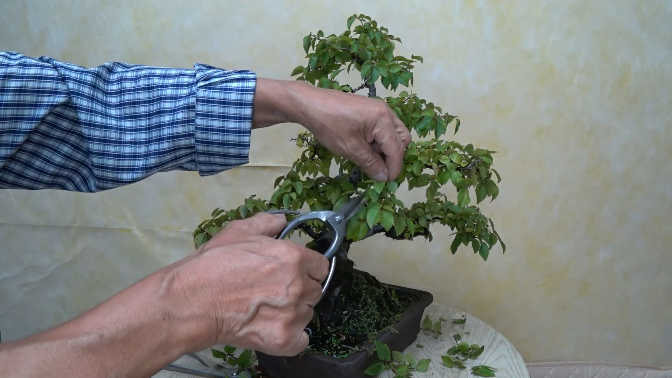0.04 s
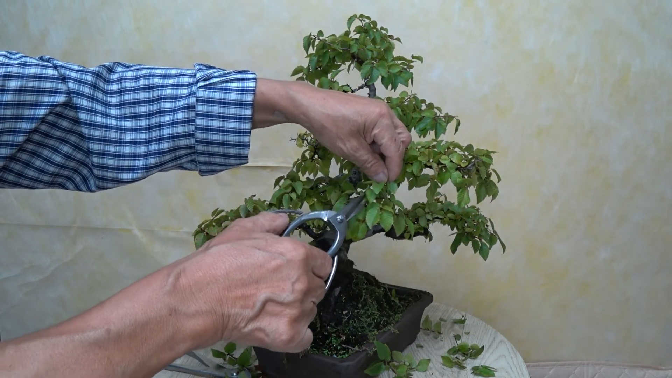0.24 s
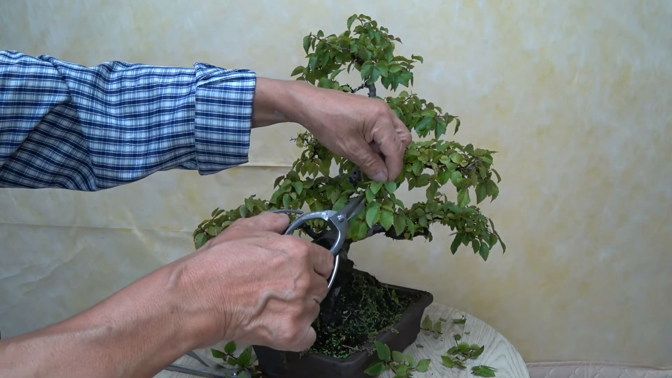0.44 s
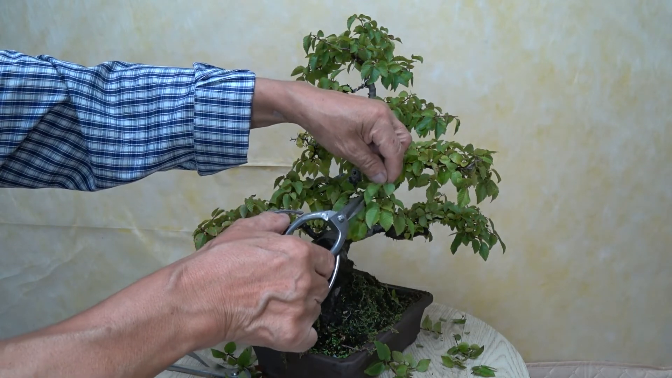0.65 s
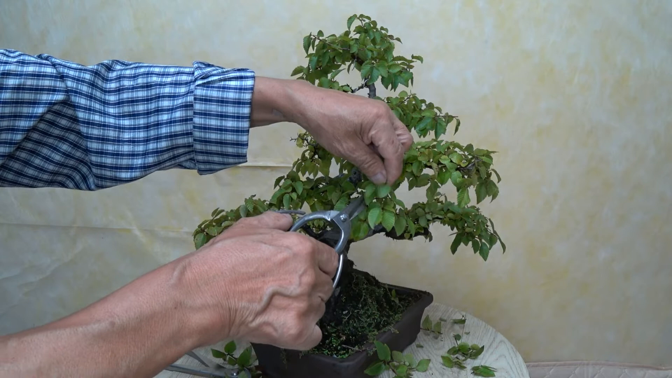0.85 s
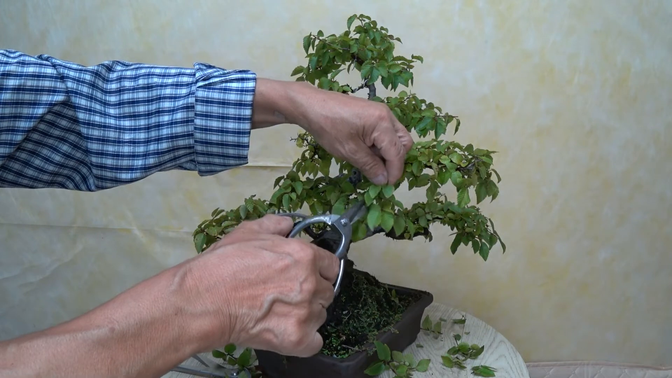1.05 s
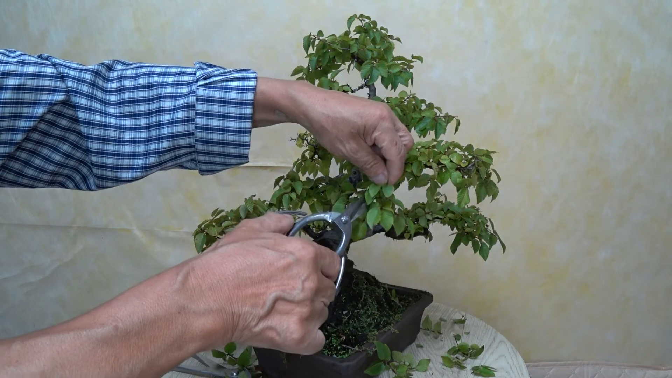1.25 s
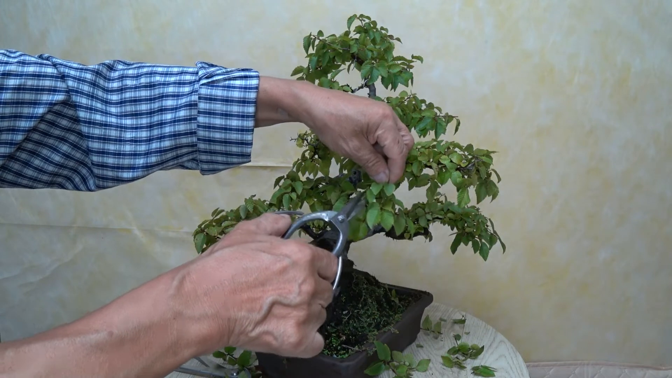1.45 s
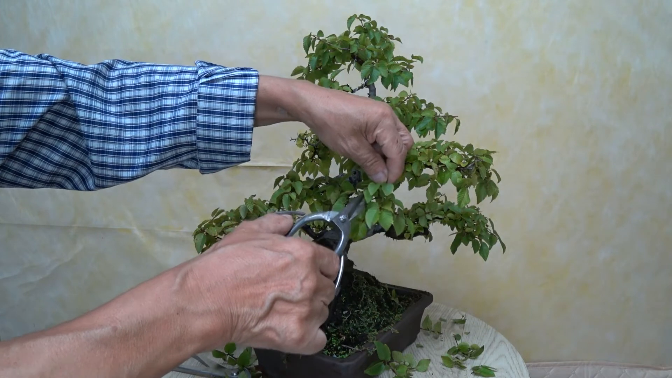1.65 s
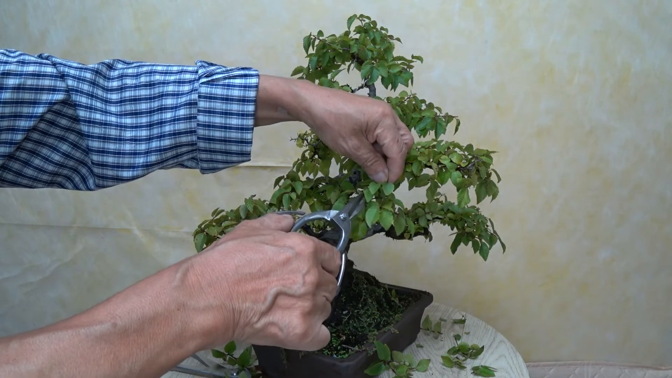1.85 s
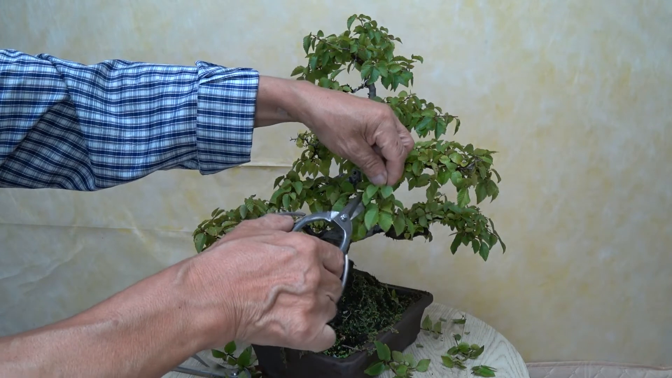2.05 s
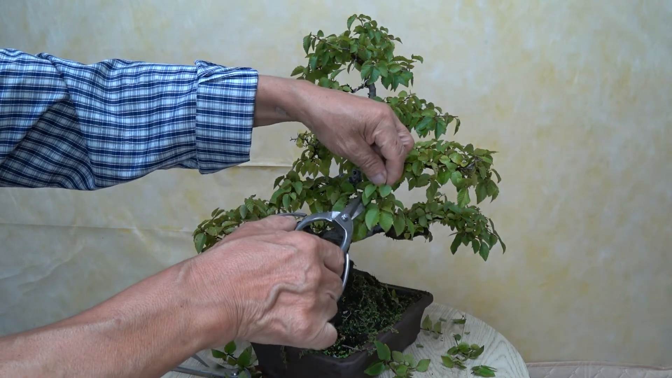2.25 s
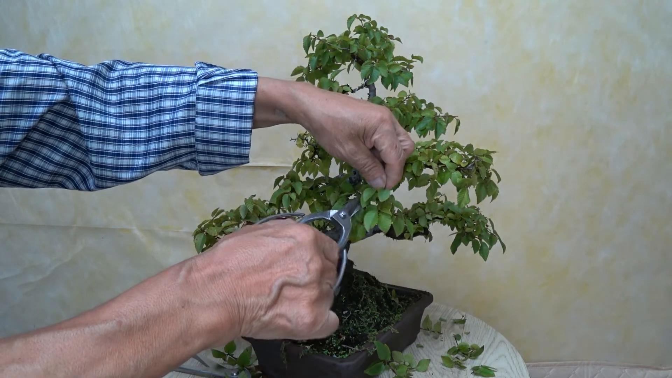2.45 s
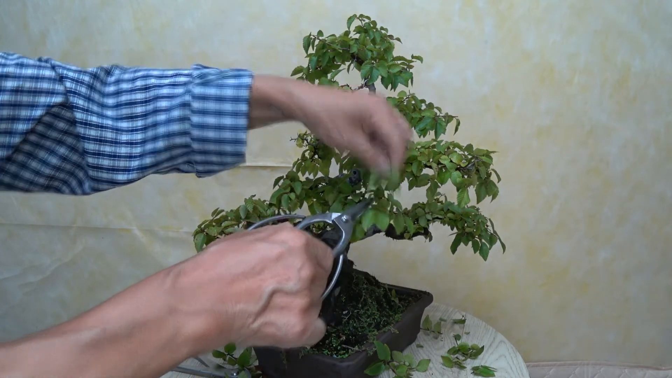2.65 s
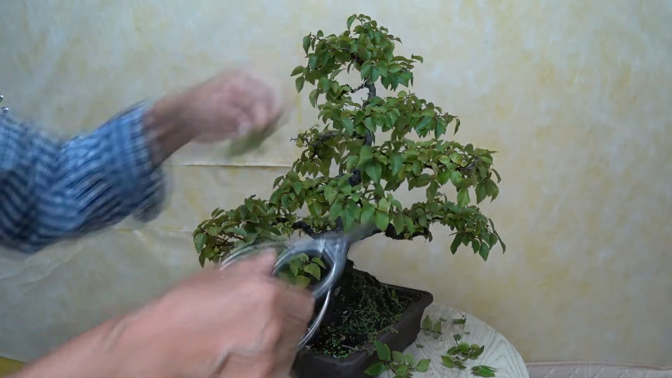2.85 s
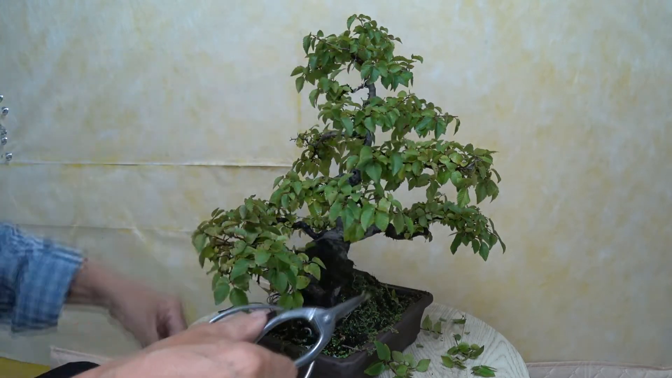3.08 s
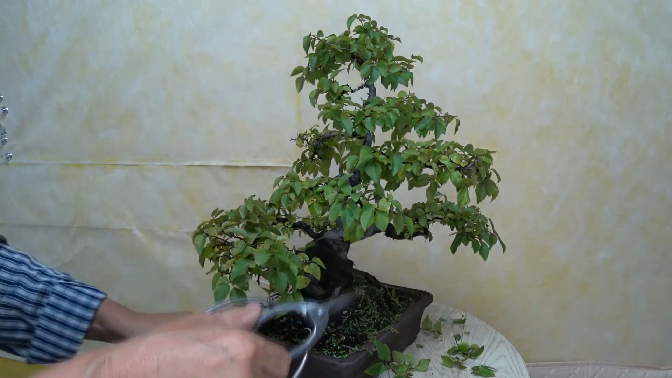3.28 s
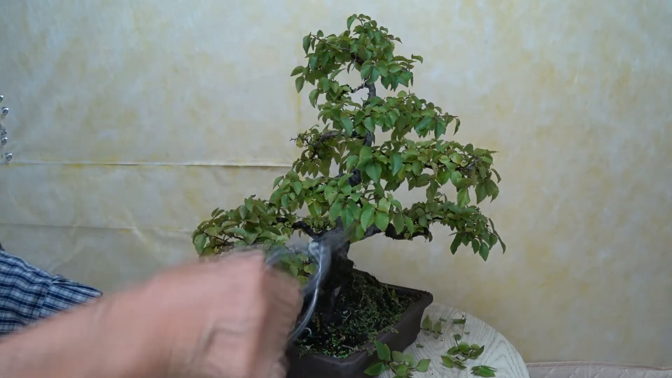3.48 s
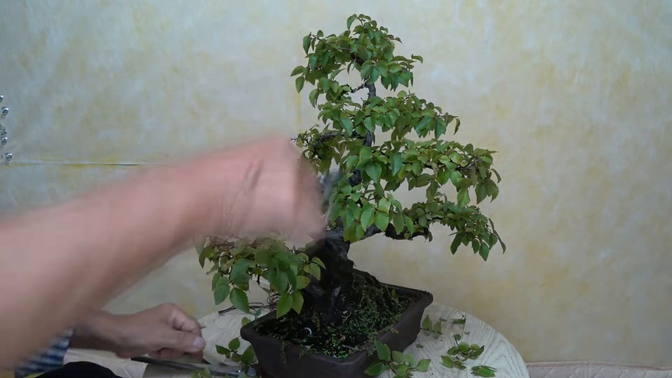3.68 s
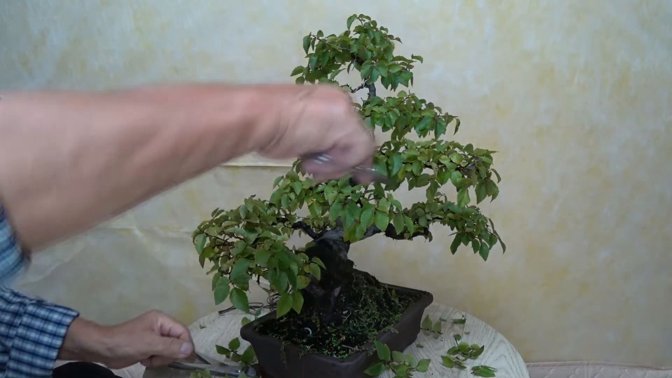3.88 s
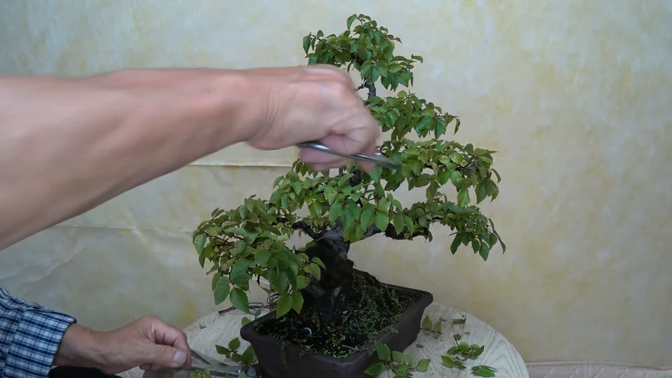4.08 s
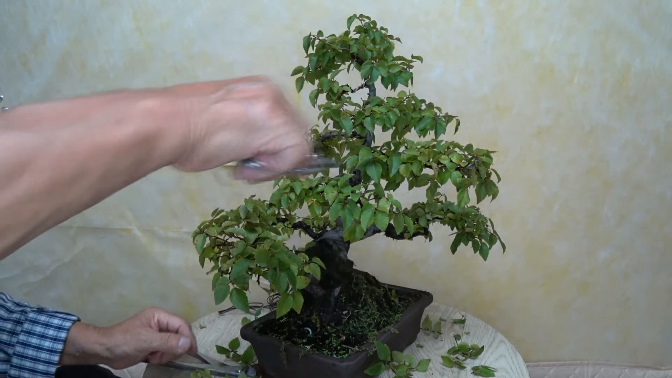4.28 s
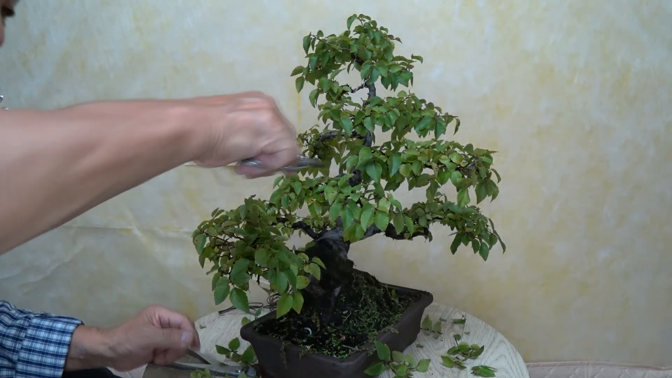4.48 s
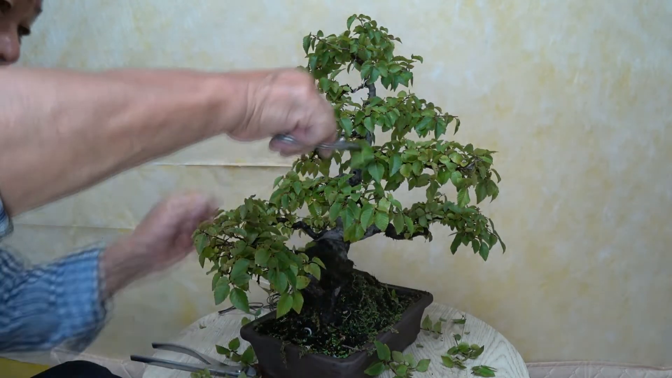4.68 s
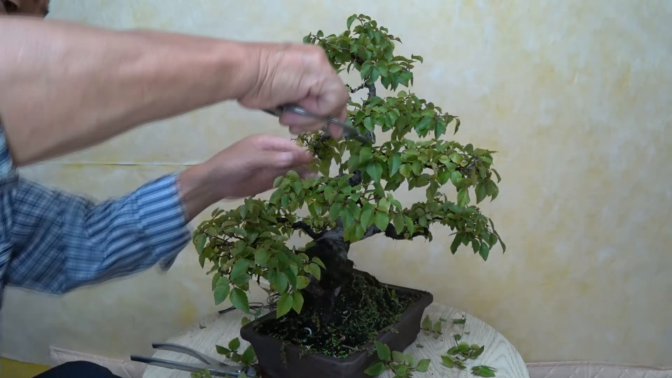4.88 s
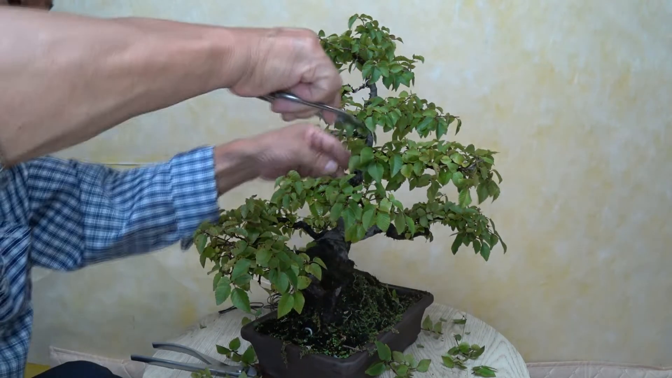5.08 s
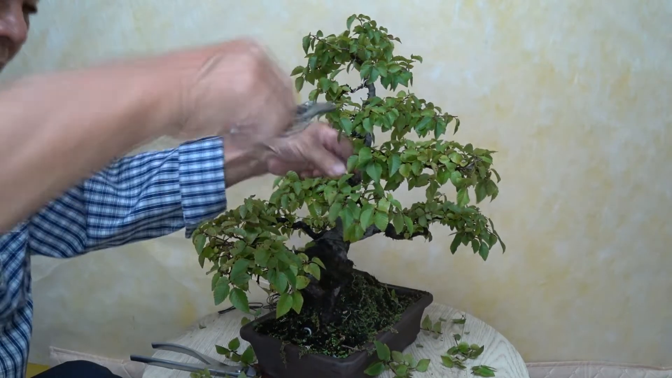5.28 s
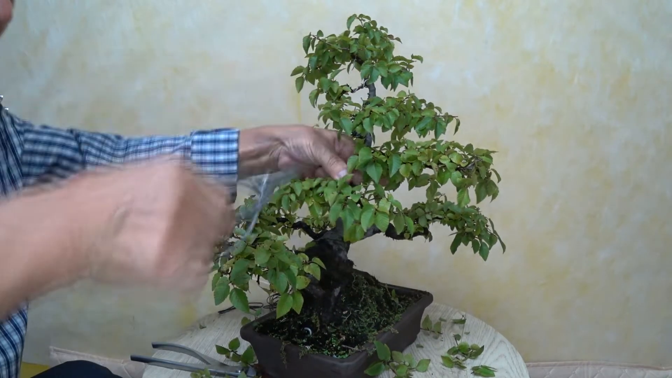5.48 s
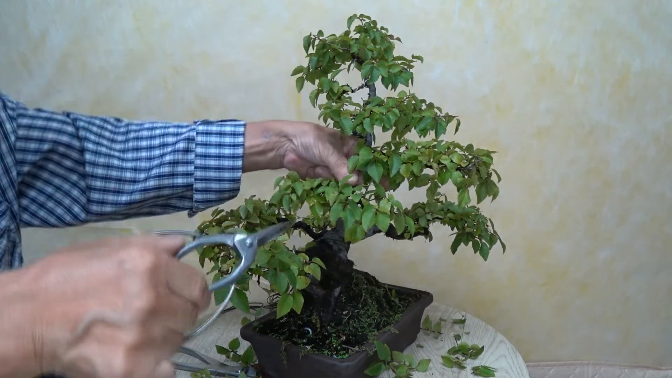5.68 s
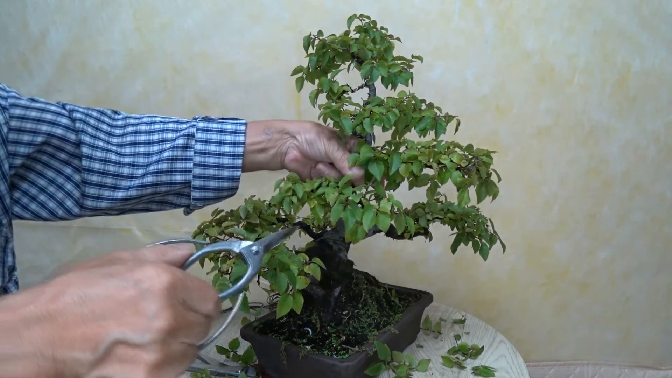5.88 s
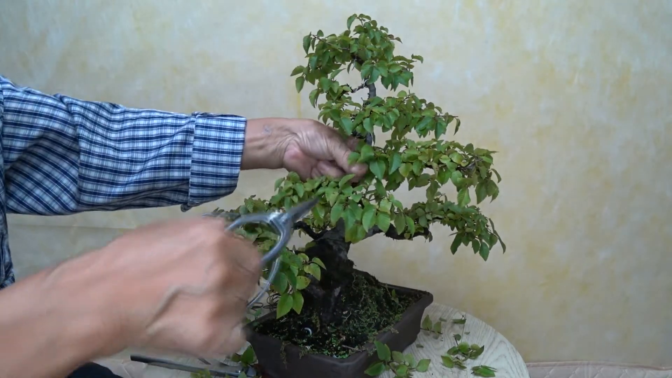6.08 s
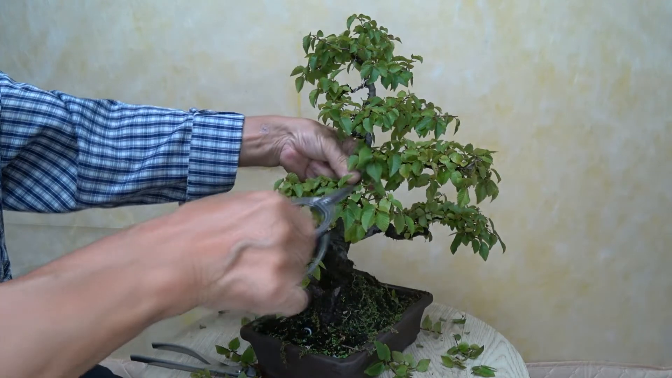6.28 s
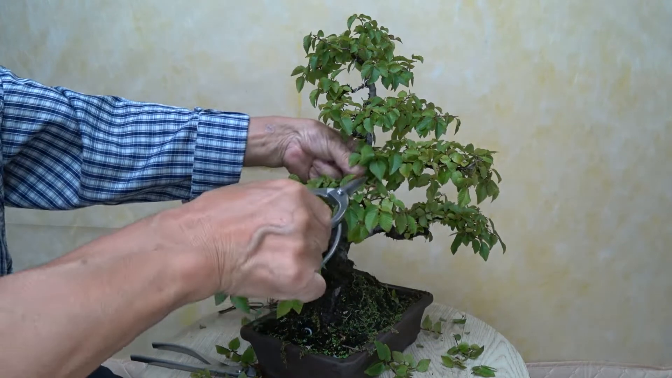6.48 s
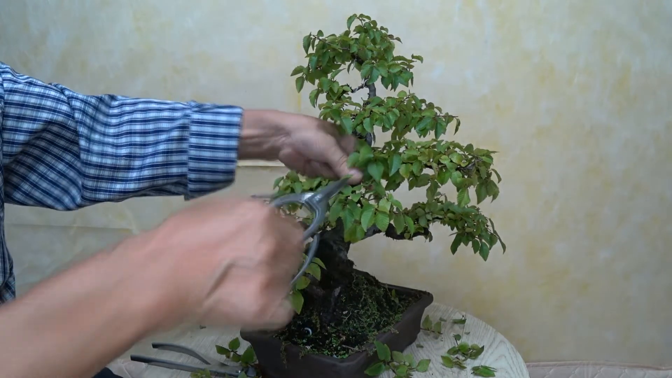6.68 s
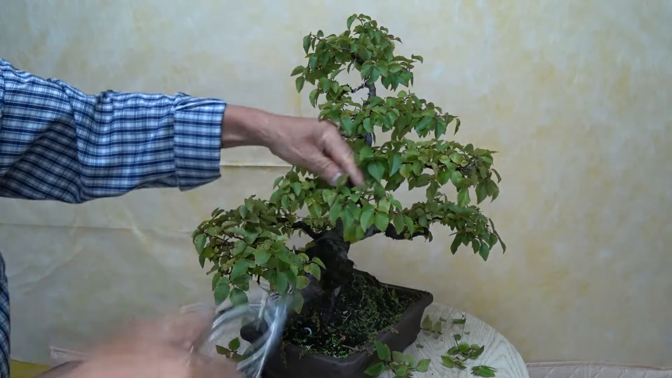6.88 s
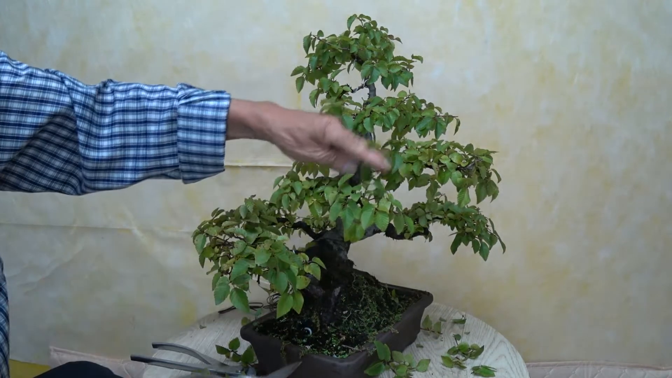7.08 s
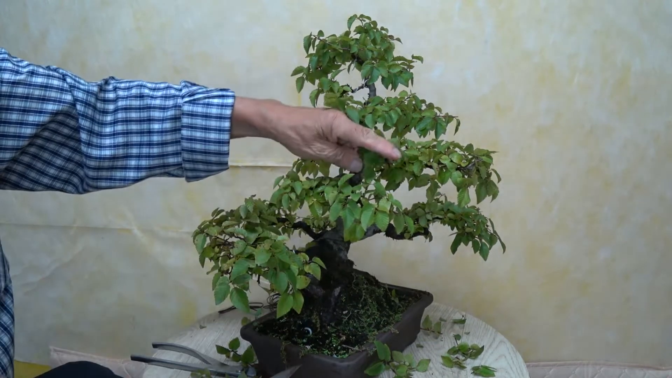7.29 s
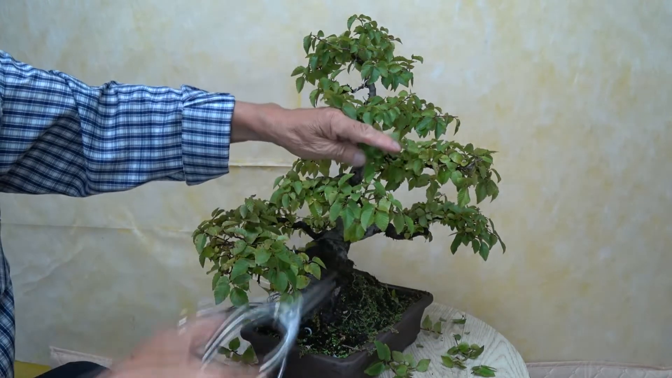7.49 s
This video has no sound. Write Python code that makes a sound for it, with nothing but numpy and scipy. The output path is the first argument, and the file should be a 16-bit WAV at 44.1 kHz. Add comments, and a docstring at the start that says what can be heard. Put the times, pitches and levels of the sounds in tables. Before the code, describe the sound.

Faint, scattered clicks of twigs and shear blades open over a steady low hiss. One sharp snip rings the steel briefly, and after it come several soft wooden knocks, slightly to the left. Leaves and sleeves rustle more and more as the small tree is handled, with quicker, crisp ticks. It is heard from about a metre away in a quiet room with a short echo.

```python
"""Steel shears trim a small potted tree in a quiet room, a metre from two steadily hissing microphones. At
first twigs and blades tick lightly while leaves and sleeves rustle. At 2.5 s the blades slam shut in one hard
snip that rings the steel. From 3.2 to 6 s, dull knocks ring wood out of sight. Toward the end, from about 5.4
s, the ticks and rustling grow busier. The room answers the snip, ticks and knocks with a short echo."""
import sys
import numpy as np
from scipy import signal
from scipy.fft import rfft, irfft, next_fast_len
from scipy.io import wavfile
from scipy.ndimage import uniform_filter1d

SR = 44100
rng = np.random.default_rng(int(sys.argv[2]) if len(sys.argv) > 2 else 0)


def pcm_store(signal):
    """Save signal as 16-bit PCM."""
    levels = np.round(np.clip(np.atleast_2d(signal), -1, 1) * 32767)
    wavfile.write(sys.argv[1], SR, levels.astype(np.int16).T)


N = 332274


def amp(db):
    """Turn decibels into a gain to multiply by."""
    return 10 ** (np.asarray(db) / 20)


def unit(x):
    """Scale x to an average strength (rms) of 1."""
    return x / np.sqrt(np.mean(x ** 2) + 1e-20)


def along(points, hz):
    """Read between the (frequency, value) rows of a table, on a log frequency scale."""
    f, v = np.transpose(points)
    return np.interp(np.log(hz + 1), np.log(f + 1), v)


def filtered(x, response):
    """Multiply each frequency in x by response(frequency)."""
    n = x.shape[-1]
    padded = next_fast_len(n + 8192)
    return irfft(rfft(x, padded) * response(np.fft.rfftfreq(padded, 1 / SR)), padded)[..., :n]


def noise(spectrum, size=N):
    """Noise of strength 1, its tone shaped by a table."""
    return unit(filtered(rng.standard_normal(size), lambda hz: amp(along(spectrum, hz))))


def resonance(f, hz, width):
    """The response of something that rings at hz and dies away; gain 1 at that pitch."""
    return 1j * f * abs(width) / (hz * hz - f * f + 1j * f * abs(width))


def add(out, s, x):
    """Mix x into out, starting at s seconds."""
    part = out[..., round(s * SR):][..., :x.shape[-1]]
    part += x[..., :part.shape[-1]]


def patchy(x, depth_db):
    """Make x louder and softer in random patches, about 1 kHz by 20 ms."""
    spectrum = signal.stft(x, nperseg=256)[2]
    patches = uniform_filter1d(rng.standard_normal(spectrum.shape[1:]), size=6, axis=0)
    patches = uniform_filter1d(patches, size=7, axis=1)
    return signal.istft(spectrum * amp(depth_db * unit(patches)), nperseg=256)[1][:, :N]


def in_room(x, pan_db, echo_db):
    """Place x left (pan_db > 0) or right; echo from the walls builds up, then dies faster in the treble."""
    # time the echo takes to fade by 60 dB: f/Hz, fade/s
    fade_times = [(200, 0.31), (1000, 0.17), (3000, 0.18), (7000, .2), (14000, 0.15)]
    # stereo width of the echo, side compared with mid: f/Hz, level/dB
    echo_width = [(100, -25), (400, -13), (900, -8), (2400, -1), (4500, -9), (8000, -6), (15000, -2)]
    hz, t, spectrum = signal.stft(rng.standard_normal((2, SR // 5)), SR, nperseg=128)
    spectrum[1] *= amp(along(echo_width, hz))[:, None]
    fade = amp(-60 * t / along(fade_times, hz)[:, None])
    tail = signal.istft(spectrum * fade, SR, nperseg=128)[1]
    tail *= 1 - np.exp(-(np.arange(tail.shape[1]) / SR / .012) ** 2)  # builds up in about 12 ms
    mid, side = signal.fftconvolve(x[None], tail / np.linalg.norm(tail[0]), axes=1) * amp(echo_db)
    out = np.array([mid + side, mid - side])
    out[:, :len(x)] += x * amp([[pan_db / 2], [-pan_db / 2]])
    return out


def hiss():
    """Two microphones hiss: mid is the same in both ears, side is opposite in left and right."""
    # tone of each microphone's hiss: f/Hz, level/dB
    mid_tone = [(12, -16), (20, 9), (38, -1.5), (110, -1), (248, -5.5), (642, -15), (1530, -17.5),
                (1860, -21.5), (2260, -20.5), (8650, -37), (13200, -30), (14700, -27), (16000, -41)]
    side_tone = [(12, -52.5), (20, -22), (113, -4), (357, -0.5), (849, -2), (2670, -12), (8650, -28.5),
                 (12400, -26), (14700, -28), (16000, -42)]
    mid = amp(-59.5) * noise(mid_tone)
    side = amp(-58.5) * noise(side_tone)
    return np.array([mid + side, mid - side])


def rustle():
    """Leaves and cloth make countless tiny snaps: a slow stir, with short brushes swelling over it."""
    # slow stir of leaves and sleeves: t/s, level/dB
    stir = [(0, -73.5), (1.8, -76.5), (2.4, -70), (2.95, -73), (3.06, -63), (3.13, -73), (3.35, -57),
            (3.45, -79.5), (3.85, -65), (4.25, -76), (4.75, -70), (5.75, -64.5), (6.17, -70), (6.55, -70),
            (6.64, -70.5), (6.72, -66.5), (6.89, -59.5), (7.15, -60), (7.28, -66.5), (7.42, -65),
            (7.53, -64.5)]
    # single brushes through the leaves: peak t/s, level/dB, length/s
    brushes = [(0.332, -75, 0.03), (0.72, -68.5, .1), (0.908, -69.5, 0.079), (1.003, -71, 0.032),
               (1.468, -62, 0.052), (2.075, -67, 0.04), (2.312, -72, .059), (3.005, -50, 0.059),
               (3.178, -59.5, .021), (3.213, -55, .07), (3.336, -61, 0.018), (3.89, -58, 0.08),
               (4.109, -71, .044), (4.411, -63.5, 0.032), (4.641, -64.5, 0.041), (4.787, -58.5, 0.048),
               (5.186, -62, 0.041), (5.368, -59.5, 0.07), (5.468, -60, 0.039), (5.501, -58.5, 0.025),
               (5.603, -61, 0.028), (5.691, -59.5, 0.021), (5.808, -62, 0.018), (5.893, -65, 0.019),
               (6.046, -62, 0.051), (6.256, -61, 0.09), (6.342, -59.5, 0.046), (6.445, -63.5, 0.029),
               (6.524, -65, 0.073), (6.732, -58, 0.096), (6.83, -55.5, 0.12), (6.907, -60, 0.064),
               (6.982, -56, 0.023), (7.048, -57, 0.056), (7.115, -54.5, .036), (7.175, -58, 0.042),
               (7.207, -59, 0.036), (7.298, -59, 0.034), (7.525, -59, 0.04)]
    # tone of the leaves: f/Hz, level/dB
    leaf_tone = [(400, -39), (700, -1), (1200, -2.5), (1900, -2.5), (2600, -0.5), (3500, 0), (4600, 0),
                 (5600, -2.5), (6700, 0.5), (9000, -9.5), (11500, -6.5), (16000, -14.5)]
    t = np.arange(N) / SR
    stir_db = np.interp(t, *np.transpose(stir))
    treble_db = stir_db - 2.5 - .25 * (stir_db + 72.5)  # a louder stir sounds duller
    low_power, high_power = amp(stir_db) ** 2, amp(treble_db) ** 2
    for peak, db, length in brushes:
        near = abs(t - peak) < .2
        slope_s = length * np.where(t[near] < peak, 0.37, 0.63)  # swells faster than it fades
        swell = amp(db) * np.exp(-((t[near] - peak) / slope_s) ** 2)
        low_power[near] += swell ** 2
        high_power[near] += (amp(-0.5) * swell) ** 2
    snaps = rng.standard_normal((2, N))
    flicker_db = 1.9 * unit(uniform_filter1d(rng.standard_normal(N), size=60))
    snaps = patchy(snaps * amp(flicker_db), depth_db=2.5)
    colour = lambda hz: amp(along(leaf_tone, hz))
    treble = lambda hz: 1 / (1 + (9000 / (hz + 1)) ** 6)
    low = unit(filtered(snaps, lambda hz: colour(hz) * (1 - treble(hz))))
    high = unit(filtered(snaps, lambda hz: colour(hz) * treble(hz)))
    mid, side = np.sqrt(low_power) * low + np.sqrt(high_power) * high
    return np.array([mid + amp(-8) * side, mid - amp(-14.0) * side]) * amp([[-.4], [.4]])


def knocks():
    """A soft blow rings the wood, a little differently each time, with a rattling puff of noise on top."""
    # knocks on wood: t/s, level/dB, extra rattle/dB
    blows = [(3.239, -34.5, -3), (3.278, -56, -18), (4.094, -55.5, -19), (4.556, -53, -23),
             (4.585, -50.5, -9), (4.674, -37.5, -2.5), (4.984, -40.5, -5), (5.961, -39.5, -3.5)]
    # notes the wood rings at: f/Hz, level/dB, time to fade by 60 dB/s
    wood_notes = [(124.5, -4.5, 0.12), (164, -12, 0.12), (217, -9.5, 0.13), (325, 1, 0.066),
                  (383, 1.5, 0.069), (450.4, -2.5, 0.082), (543, -8, 0.097), (615, -7.5, 0.12),
                  (977, -3.5, 0.037), (1537, -3.5, 0.054), (1900, -22.5, 0.079)]
    # tone of the rattle: f/Hz, level/dB
    rattle_tone = [(410, -39), (700, -7), (1310, -8.5), (1560, -4.5), (2740, -9), (4420, -6.5), (5400, -12),
                   (7200, -10.5), (8170, -19.5), (14000, -27)]
    out, t = np.zeros((2, N)), np.arange(SR // 5) / SR
    rise = (1 - np.exp(-t / .003)) ** 2
    for s, db, rattle_db in blows:
        ring = np.zeros(len(t))
        for k, (hz, level, fade_s) in enumerate(wood_notes):
            fade = amp(level + rng.normal(0, 1.5) - 60 * t / fade_s)
            bloom = 1 - np.exp(-hz * t / 0.49)  # low notes swell later
            ring += (-1) ** k * fade * bloom * np.sin(2 * np.pi * hz * t)
        puff = amp(rattle_db + 5.0 - 60 * t / 0.1) * noise(rattle_tone, size=len(t))
        knock = amp(db) * rise * (amp(-1) * ring + puff)
        add(out, s, in_room(knock, pan_db=2.1, echo_db=-8.5))
    return out


def pings():
    """Small hard parts each ring briefly at one slightly unsteady pitch."""
    # single pings: t/s, level/dB, f/Hz, time to fade by 60 dB/s
    notes = [(.324, -51, 3870, 0.021), (.991, -51, 3220, .015), (2.5363, -35, 976, 0.014),
             (2.5418, -47, 910, 0.0096), (2.981, -48.5, 4640, 0.11), (3.17, -52, 2570, 0.052),
             (3.244, -50, 7330, .07), (3.277, -44, 5600, .04), (3.278, -53, 9100, 0.14),
             (3.335, -34.5, 7100, 0.014), (4.408, -52, 5400, 0.019), (4.788, -57, 6450, 0.088),
             (5.373, -48, 4800, .03), (6.527, -53, 6230, 0.067), (6.854, -38, 4800, 0.013),
             (7.209, -46, 3530, 0.018)]
    out, t = np.zeros((2, N)), np.arange(SR // 10) / SR
    rise = 1 - np.exp(-t / 0.00047)
    for s, db, hz, fade_s in notes:
        waver = np.cumsum(rng.standard_normal(len(t))) * 0.1
        add(out, s, amp(db - 60 * t / fade_s) * rise * np.sin(2 * np.pi * hz * t + waver))
    return out


def ticks():
    """Twigs and blades tick in bursts of about a millisecond; the pot and table bounce each one back."""
    # the clearest ticks: t/s, level/dB, f/Hz
    clear_ticks = [(0.0602, -46.5, 8200), (0.324, -44, 4200), (0.501, -42.5, 10900), (0.6887, -45, 6500),
                   (0.715, -46, 6560), (0.9907, -42.5, 5840), (1.141, -41.5, 8250), (1.459, -59, 6600),
                   (1.486, -43, 6860), (1.986, -46, 9100), (2.053, -43, 8750), (2.071, -40, 8300),
                   (2.1067, -50, 8400), (2.2951, -44, 7040), (2.321, -45.5, 7300), (2.3714, -46.5, 5460),
                   (2.39, -48.5, 6200), (2.4026, -39, 11500), (2.4217, -45, 11000), (2.4493, -23, 9200),
                   (2.502, -42, 7400), (2.5198, -37, 6700), (2.693, -40, 11500), (2.7002, -35, 9650),
                   (2.709, -38.5, 5500), (2.9741, -36, 7500), (3.018, -23, 11300), (3.2772, -33.5, 4900),
                   (3.3338, -37, 9300), (3.893, -36, 8770), (3.917, -37, 5300), (4.407, -40.5, 5100),
                   (4.781, -39, 6460), (5.192, -43.5, 7300), (5.3737, -42, 6200), (5.389, -46, 7500),
                   (5.427, -39.5, 6500), (5.4407, -37.5, 8150), (5.4646, -38.5, 8400), (5.49, -42, 6000),
                   (5.637, -50, 3500), (5.6962, -43.5, 7000), (5.8096, -41, 8800), (5.891, -37, 6060),
                   (5.9528, -34, 7000), (6.072, -43, 8000), (6.0878, -43.5, 8300), (6.126, -39, 7000),
                   (6.1962, -44, 7500), (6.264, -34, 7740), (6.3018, -34, 11300), (6.325, -29.5, 10500),
                   (6.3408, -29, 10600), (6.3614, -36.5, 8600), (6.4408, -39, 10000), (6.5267, -33.5, 9000),
                   (6.7081, -36, 6700), (6.799, -38, 4500), (6.8539, -33.5, 6040), (6.9802, -35, 6100),
                   (7.0057, -28.5, 7200), (7.112, -33.5, 9100), (7.121, -30.5, 7400), (7.1858, -37, 4000),
                   (7.2087, -33.5, 4300), (7.294, -35, 10000), (7.3332, -43, 5800), (7.3734, -41, 5660),
                   (7.5176, -34.5, 5300)]
    out, t = np.zeros((2, N)), np.arange(SR // 100) / SR
    count = round(4 * N / SR)  # four faint ticks a second, at random times
    when = rng.random(count) * N / SR
    size, pitch = rng.standard_normal((2, count))
    faint_ticks = zip(when, -55 + 2.5 * size, 7000 * 2 ** (0.37 * pitch))
    shape = amp(-60 * t / .0045) * (1 - np.exp(-t / .0002))
    for s, db, hz in [*faint_ticks, *clear_ticks]:
        burst = rng.standard_normal(len(t)) * shape
        tick = filtered(burst, lambda f: resonance(f, hz, width=1.5 * hz) ** 2)
        tick = amp(db) * tick / abs(tick).max()
        add(tick, .0023, amp(-13) * tick)  # bounce off the pot and table
        add(out, s, in_room(tick, pan_db=rng.normal(-1.3, 2), echo_db=-13))
    return out


def snip():
    """The blades slam shut, touching a few times in quick succession and making the steel ring."""
    # blade hitting blade: t/s, level/dB
    contacts = [(2.5362, -10), (2.5371, -17), (2.5406, -8), (2.5418, -10), (2.544, -13)]
    # broad bands the steel rings in: f/Hz, width/Hz, level/dB
    steel_bands = [(970, 820, -30.5), (2450, 450, -15.5), (3270, 540, -16.5), (3870, 500, -11.5),
                   (5000, 410, -8), (6030, 520, -8.5), (6690, 400, 0.5), (7270, 540, -3), (8650, 300, -4),
                   (9400, 270, -12.5), (9900, 500, -21), (10700, 480, -0.5), (11700, 360, -2.5),
                   (13200, 820, -3), (13800, 480, -2), (15300, 350, -1)]
    start = contacts[0][0]
    blows, t = np.zeros(SR // 20), np.arange(SR // 200) / SR
    for s, db in contacts:
        add(blows, s - start, amp(db - 60 * t / 0.003) * unit(rng.standard_normal(len(t))))
    steel = lambda f: sum((-1) ** k * amp(db) * resonance(f, hz, width)
                          for k, (hz, width, db) in enumerate(steel_bands))
    ring = amp(6.5) * filtered(blows, steel)
    out = np.zeros((2, N))
    add(out, start, in_room(ring, pan_db=-2.5, echo_db=-1.5))
    return out


def scene():
    """All the sounds together, left and right."""
    return snip() + ticks() + pings() + knocks() + rustle() + hiss()


def record(dry):
    """The camera keeps nothing above 15900 Hz."""
    return filtered(dry, lambda hz: hz < 15900)


dry = scene()
out = record(dry)
pcm_store(out)
```